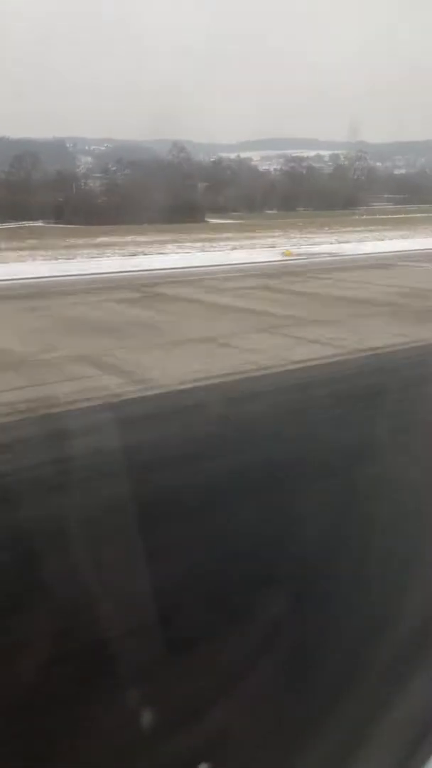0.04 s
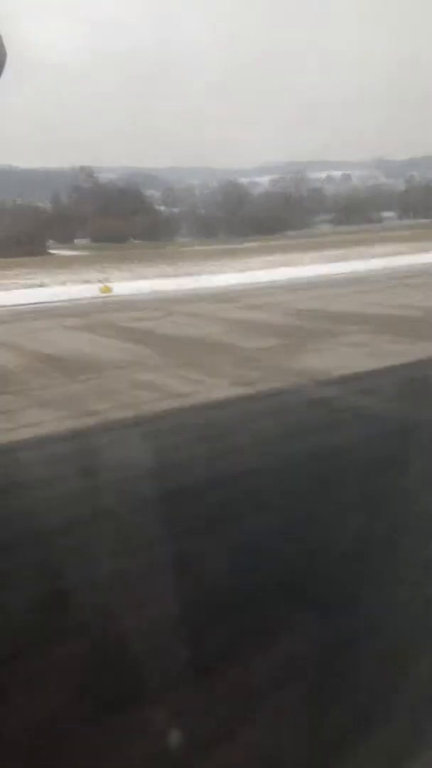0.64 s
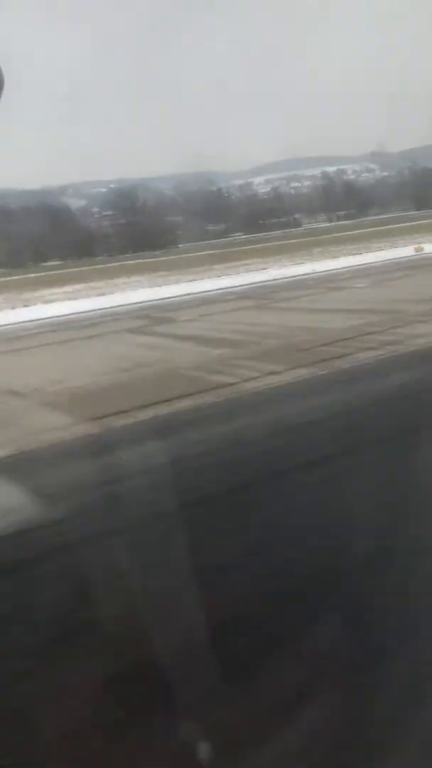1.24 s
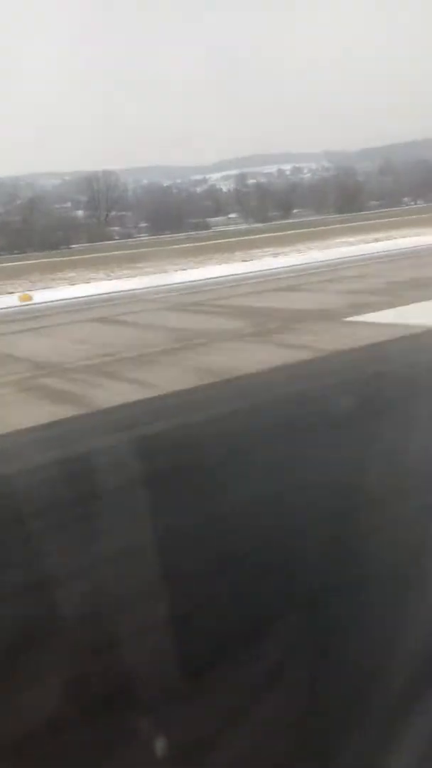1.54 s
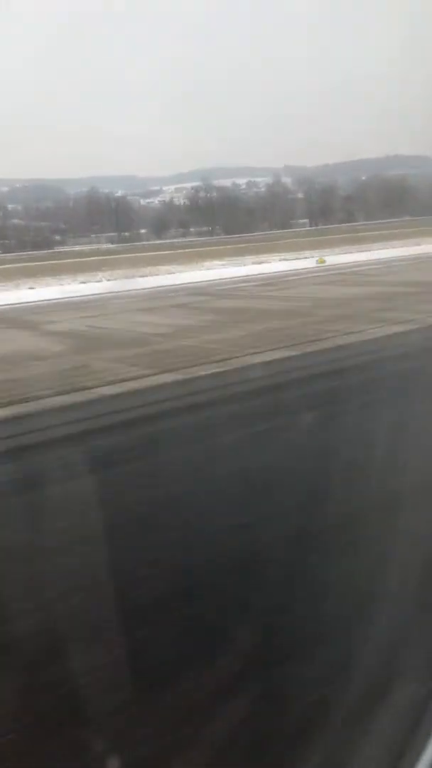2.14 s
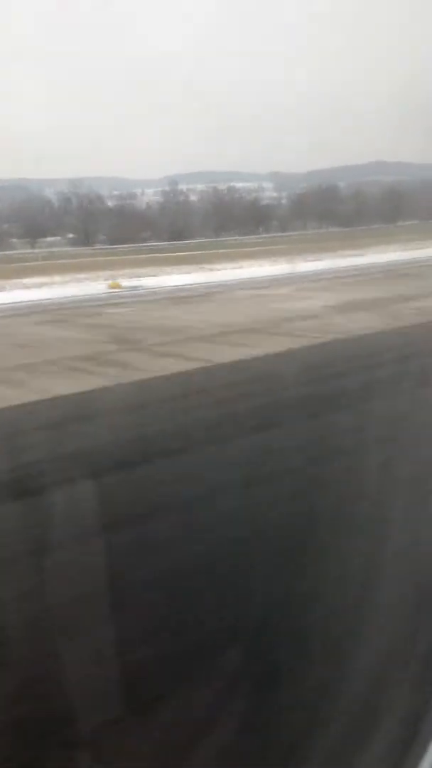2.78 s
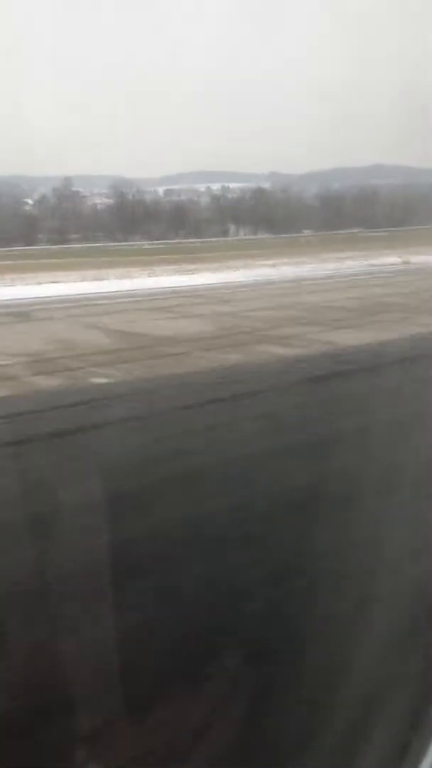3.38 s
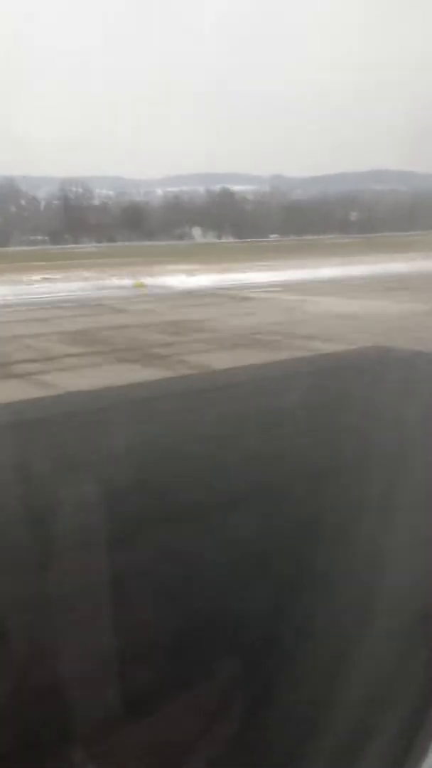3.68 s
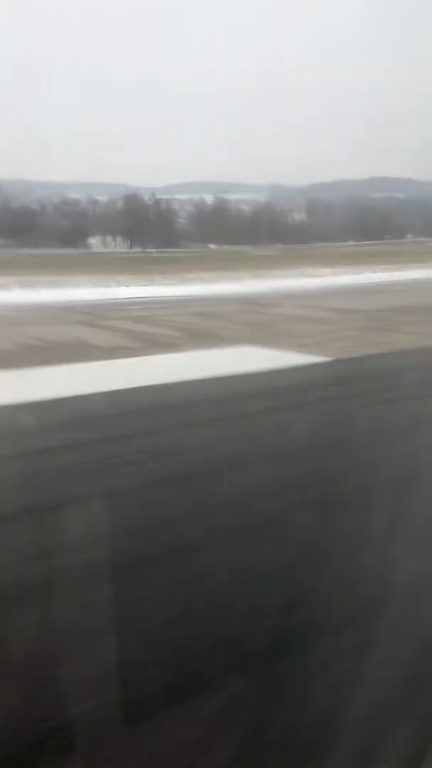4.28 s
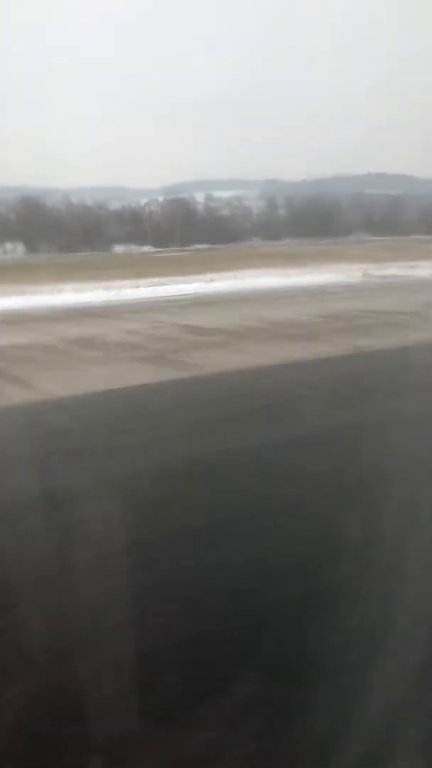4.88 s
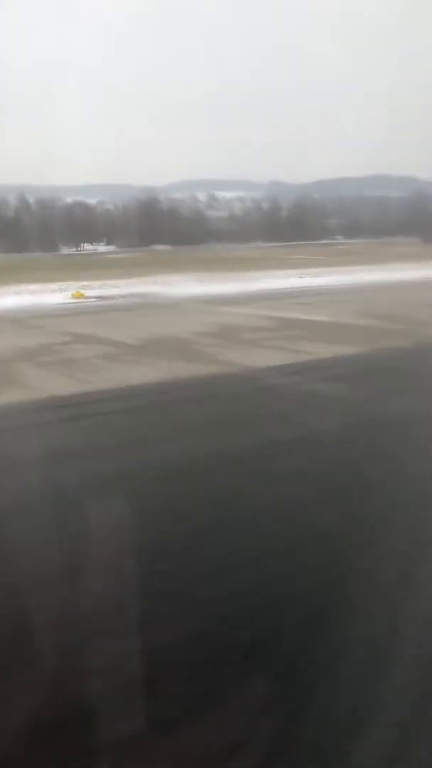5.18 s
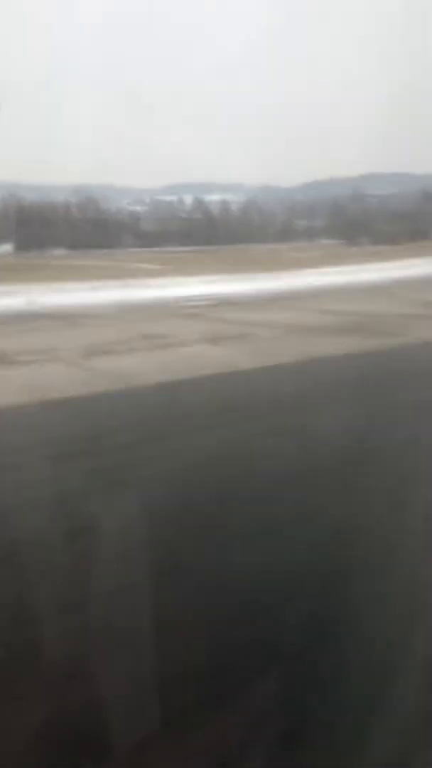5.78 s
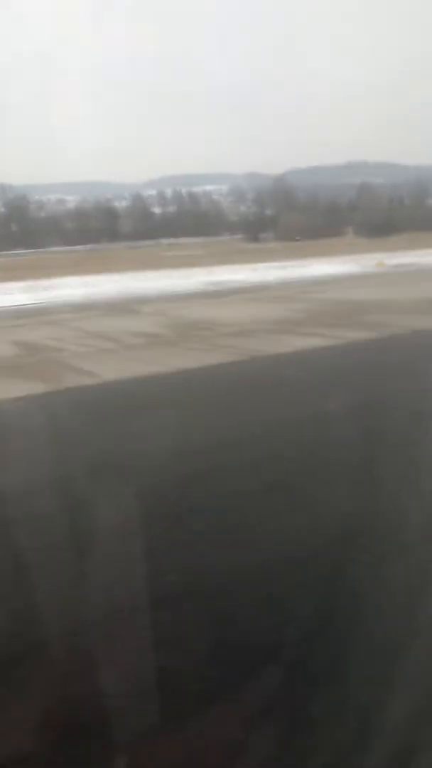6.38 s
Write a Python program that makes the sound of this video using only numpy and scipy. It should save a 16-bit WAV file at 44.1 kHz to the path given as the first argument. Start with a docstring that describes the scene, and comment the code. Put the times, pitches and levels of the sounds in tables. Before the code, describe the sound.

Inside an airliner rolling along a runway, a loud, steady tyre rumble and deep engine hum fill the cabin, with rushing air and a thin high whine. A loose part rattles in quick bursts near the window seat at the start. The engines growl, then ease to idle after about two seconds. The air noise builds slightly, and near the end the plastic trim scuffs and the rattle returns.

```python
"""An airliner rolls along the runway after landing, heard from a window seat.
From the start the engine shafts drone under a thin whine, tyres rumble, exhaust roars and air hisses,
while a small loose part chatters nearby. The engines growl, then ease to idle by about two seconds,
as a few faint swishes, scuffs of plastic trim and tiny squeaks come and go.
The air noise then slowly builds, and near the end the trim scuffs and the loose part chatters again."""
import sys
import numpy as np
from scipy import signal
from scipy.fft import rfft, irfft, next_fast_len
from scipy.io import wavfile
from scipy.ndimage import uniform_filter1d, map_coordinates

SR = 44100
rng = np.random.default_rng(int(sys.argv[2]) if len(sys.argv) > 2 else 0)


def bounce(signal):
    """Save signal as a 16-bit WAV file at the path given by the first command-line argument."""
    frames = np.transpose(np.atleast_2d(signal))
    limited = np.clip(frames, -1, 1)
    pcm = np.round(limited * 32767).astype(np.int16)
    wavfile.write(sys.argv[1], SR, pcm)


N = 292374
SHAFT_HZ = 85.45  # engine shaft turns per second

# how hard the engines push, given as the loudness of their growl: time_s, level_db
THRUST = [(0, -28.5), (.4, -25.5), (1.2, -26.5), (1.65, -30), (2.05, -43), (6.63, -55)]


def amp(db):
    """Turn decibels into a gain."""
    return 10 ** (np.asarray(db) / 20)


def unit(x):
    """Scale a signal to an average (rms) level of 1."""
    return x / np.sqrt(np.mean(x ** 2) + 1e-20)


def along(points, hz):
    """Read between (pitch_hz, value) points on a log pitch scale."""
    pitches, values = np.transpose(points)
    return np.interp(np.log(hz + 1), np.log(pitches + 1), values)


def curve(points):
    """Join (time_s, value) points with straight lines, one value per sample."""
    times, values = np.transpose(points)
    return np.interp(np.arange(N) / SR, times, values)


def swell(peak_s, half_length_s):
    """A bell-shaped rise to 1 and back."""
    return np.exp(-.5 * ((np.arange(N) / SR - peak_s) / half_length_s) ** 2)


def wobble(rate):
    """A smooth random curve through `rate` new values a second."""
    return map_coordinates(rng.standard_normal(int(N * rate / SR) + 4), [np.arange(N) * rate / SR])


def filtered(x, response):
    """Scale each frequency in x by response(hz)."""
    size = next_fast_len(N + SR // 2)
    return irfft(rfft(x, size) * response(np.fft.rfftfreq(size, 1 / SR)), size)[:N]


def rush(colour, patchy_db):
    """Rushing noise of a given tone colour, with drifting louder and softer patches."""
    slices = signal.stft(rng.standard_normal(N), nperseg=1024)[2]
    patches = uniform_filter1d(rng.standard_normal(slices.shape), size=8, axis=0)
    patches = uniform_filter1d(patches, size=12, axis=1)
    noise = signal.istft(slices * amp(patchy_db * unit(patches)), nperseg=1024)[1][:N]
    return unit(filtered(noise, lambda hz: amp(along(colour, hz))))


def narrow(centre_hz, width_hz):
    """Noise in one narrow band of pitch."""
    ring = lambda f: 1j * f * width_hz / (centre_hz ** 2 - f * f + 1j * f * width_hz)
    return unit(filtered(rng.standard_normal(N), lambda f: ring(f) ** 2))


def tone(turns, waver_db, rate):
    """A pure tone, one cycle per turn, that wavers in loudness."""
    return unit(np.sin(2 * np.pi * (turns + rng.random())) * amp(waver_db * wobble(rate)))


def spin(hz, drift_hz, rate):
    """A running count of turns at a speed that drifts a little."""
    return np.cumsum(hz + drift_hz * wobble(rate)) / SR


def level(idle_db, thrust_adds_db):
    """The gain of a layer that changes with how hard the engines push."""
    thrust_db = curve(THRUST)
    load = amp(thrust_db - thrust_db.max())  # 1 at full thrust, near 0 at idle
    return amp(idle_db + thrust_adds_db * load)


def drone(shaft):
    """A slightly unbalanced shaft shakes the cabin once a turn; its overtones come and go."""
    # rise and fall of the lowest note: time_s, level_db
    loudness = [(0.1, -11), (0.15, -11.5), (1.18, -16.5), (1.3, -21), (2.94, -13.5), (4.03, -16.5),
                (4.21, -13), (5.85, -11.5), (5.93, -17), (6.02, -10), (6.35, -15)]
    # higher notes: cycles_per_turn, level_db
    overtones = [(2, -29), (3, -30)]
    lowest = amp(curve(loudness) + 0.35) * tone(shaft, waver_db=.5, rate=11)
    return lowest + sum(amp(db) * tone(cycles * shaft, waver_db=3.5, rate=6) for cycles, db in overtones)


def whine(shaft):
    """Compressor blades sing around a whistle; the whistle leads under thrust, the blades at idle."""
    # blades and whistle together: time_s, level_db
    loudness = [(0.7, -65), (1.06, -57), (1.22, -66), (2.55, -57.5), (2.64, -65), (2.86, -61.5),
                (5.18, -61.5), (6.1, -65)]
    # blade tones: cycles_per_turn, relative_db
    blade_tones = [(64, -11.5), (65, -12.5), (66, -6.5), (67, -12.5), (68, -5.5), (69, -9)]
    # path of the whistle: time_s, pitch_hz
    whistle_pitch = [(0, 5630), (1.0, 5790), (2.6, 5800), (3.1, 5680), (3.6, 5730)]
    # a faint ring about an octave above the whistle: time_s, level_db
    octave_loudness = [(1.65, -88), (2.27, -74.5), (3.22, -77.5), (3.46, -71), (6.1, -74.5)]
    # steady turbine tones: pitch_hz, level_db
    turbine_tones = [(803, -50), (6530, -82), (6869, -83), (7293, -82), (7549, -82)]
    whistle_hz = curve(whistle_pitch)
    blades = 0
    for cycles, db in blade_tones:
        loss_db = 2.5 * ((cycles * SHAFT_HZ - whistle_hz) / 130) ** 2  # weaker away from the whistle
        blades += amp(db - loss_db) * tone(cycles * shaft, waver_db=1.5, rate=7.9)
    blades *= level(idle_db=3.5, thrust_adds_db=-8.5)
    # swirling air makes the whistle flutter in pitch and loudness
    whistle = tone(spin(whistle_hz, drift_hz=54.7, rate=300), waver_db=4, rate=70)
    whistle *= level(idle_db=-5, thrust_adds_db=5)
    octave = amp(1) * narrow(centre_hz=11500, width_hz=400)
    octave += amp(-6.5) * tone(spin(11535, drift_hz=5, rate=12), waver_db=5.5, rate=7)
    turbine = sum(amp(db) * tone(spin(hz, drift_hz=3, rate=11), waver_db=3, rate=5.4)
                  for hz, db in turbine_tones)
    octave *= amp(curve(octave_loudness) + 1.2 * wobble(6))
    return amp(curve(loudness)) * (blades + whistle) + octave + turbine


def growl():
    """The engine growls in a few bands of noise and dies down as the thrust is taken off."""
    # where the engine resonates: pitch_hz, width_hz, relative_db
    bands = [(139.4, 45, 2), (318, 70, 0), (380, 72, -6), (554, 170, -16), (1427, 150, -27.5),
             (2200, 320, -34.5), (3194, 220, -36), (4150, 1800, -36.5)]
    return amp(curve(THRUST)) * sum(amp(db) * narrow(hz, width) for hz, width, db in bands)


def rolling():
    """The wheels boom through the plane's body, the rough runway rumbles and the exhaust roars."""
    # tone colours of the three noises: pitch_hz, relative_db
    boom_colour = [(15, -38), (28, -36.5), (40, -18.5), (52, -15.5), (59, -0.5), (64, 1), (73, -6.5),
                   (90, -6), (130, -44), (300, -100)]
    rumble_colour = [(45, -60), (75, -7), (100, 0.5), (115, 1.5), (150, -0.5), (195, -5.5), (225, -3),
                     (270, -13), (400, -34), (1000, -89)]
    roar_colour = [(120, -42.5), (220, -6), (280, 2.5), (350, -5), (430, -3.5), (520, -11), (650, -13.5),
                   (730, -19), (830, -13.5), (950, -28.5), (1400, -46), (4000, -89)]
    boom = level(idle_db=-21, thrust_adds_db=-2.5) * rush(boom_colour, patchy_db=0)
    rumble = level(idle_db=-18, thrust_adds_db=-0.5) * rush(rumble_colour, patchy_db=-0.3)
    roar = level(idle_db=-26, thrust_adds_db=0.3) * rush(roar_colour, patchy_db=1.04)
    brief_dip = amp(-3 * swell(peak_s=2.12, half_length_s=0.19))
    return boom + brief_dip * (rumble + roar)


def air():
    """Air rushes along the outside, easing with the thrust and then building; the cabin vents hiss."""
    # tone colours of the outside air and the vents: pitch_hz, relative_db
    flow_colour = [(400, -36), (700, -2.5), (850, 3), (950, 0), (1130, -1), (1280, -6.5), (1520, -6.5),
                   (1800, -10.5), (2200, -15), (2800, -20.5), (5000, -43.5), (12000, -92)]
    hiss_colour = [(1200, -22.5), (2400, -1.5), (2800, -0.5), (3200, 6.5), (3700, 2), (4400, -2), (5300, 1),
                   (6300, -1), (7400, 0.5), (8400, -8), (10500, -10.5), (13000, -9.5), (17000, -13)]
    build_start_s, build_db_per_s = 2.5, 0.43
    build = amp(build_db_per_s * np.maximum(np.arange(N) / SR - build_start_s, 0))
    flow = level(idle_db=-43.5, thrust_adds_db=1.5) * rush(flow_colour, patchy_db=1)
    hiss = level(idle_db=-57.5, thrust_adds_db=-1) * rush(hiss_colour, patchy_db=1.5)
    return build * flow + hiss


def chatter(taps_per_s=88, taper_db=11):
    """A loose part taps its stop once per shake, hardest in the middle of each burst."""
    # bursts of tapping: start_s, peak_db, length_s
    bursts = [(0.019, -24.5, .057), (0.114, -25, .057), (.207, -31.5, .012), (0.242, -27.5, .046),
              (0.336, -25, .046), (0.516, -31.5, .012), (.535, -23.5, .046), (.629, -25.5, .012),
              (0.758, -28.5, .046), (0.917, -33, .023), (0.96, -32, .012), (6.175, -32, .012),
              (6.2, -27.5, .057), (6.267, -23, .057), (6.396, -22, .046), (6.489, -24.5, .046),
              (6.560, -23, .057)]
    # tone colour of one tap: pitch_hz, relative_db
    tap_colour = [(300, -50), (1500, -25), (2400, -9), (3200, -3), (6000, 0), (8500, -3), (11500, -2),
                  (13500, -9), (16000, -16), (20000, -24)]
    taps = np.zeros(N + SR)
    for start, db, length in bursts:
        count = max(1, round(length * taps_per_s))
        k = np.arange(count)
        from_middle = (2 * k + 1) / count - 1
        times = start + k / taps_per_s + rng.normal(0, .0004, count)
        tap_db = db - taper_db * from_middle ** 2 + rng.normal(0, 1, count)
        taps[np.round(abs(times) * SR).astype(int)] += amp(tap_db)
    # turn the tone colour into a dry click with its energy packed at the start
    size = 512
    gains = amp(along(tap_colour, np.fft.rfftfreq(size, 1 / SR)))
    cepstrum = irfft(np.log(gains))
    click = irfft(np.exp(rfft(2 * cepstrum[:size // 2], size)))
    return amp(3) * np.convolve(taps[:N], click / abs(click).max())[:N]


def swishes():
    """Something brushes softly close by, in uneven grainy patches."""
    # swishes and flicks: peak_s, level_db, half_length_s, pitch_hz, width_hz
    strokes = [(1.26, -66, .06, 9500, 2600), (2.37, -60, .1, 4700, 1900), (2.39, -66, .13, 10000, 4500),
               (2.33, -70, .09, 15500, 4000), (3.131, -54, .005, 4200, 2600)]
    return sum(amp(db + 3.1 * wobble(60)) * swell(peak, half_length) * narrow(hz, width)
               for peak, db, half_length, hz, width in strokes)


def scuffs(rise_s=0.00075):
    """Plastic trim shifts with short dry scuffs."""
    # each shift: start_s, level_db, fade_s (time to fall by 60 dB)
    shifts = [(1.552, -49, .04), (4.472, -54, .03), (6.128, -49, 0.054), (6.443, -35, .05)]
    # tone colour of a scuff: pitch_hz, relative_db
    colour = [(800, -15.5), (2200, 9.5), (4000, -3.5), (9000, -1), (14000, -6), (17000, -5.5)]
    t = np.arange(N) / SR
    loudness = sum(amp(db - 60 * np.maximum(t - start, 0) / fade) * np.clip((t - start) / rise_s, 0, 1)
                   for start, db, fade in shifts)
    return loudness * rush(colour, patchy_db=-1.5)


def squeaks():
    """The brushing surfaces stick and slip in faint rising squeaks."""
    # each squeak: peak_s, level_db, half_length_s, pitch_hz, rise_hz_per_s
    slips = [(2.17, -64, .02, 6080, 3000), (2.34, -66, .05, 6220, 2000), (2.28, -73, .05, 15200, 22000)]
    t = np.arange(N) / SR
    sound = np.zeros(N)
    for peak, db, half_length, hz, rise in slips:
        turns = spin(hz + rise * np.clip(t - peak, -.1, .1), drift_hz=60, rate=300)
        sound += amp(db) * swell(peak, half_length) * tone(turns, waver_db=3, rate=60)
    return sound


def scene():
    """All the sounds meet at the window seat, in one channel."""
    shaft = spin(SHAFT_HZ, drift_hz=.04, rate=10)
    engine = drone(shaft) + whine(shaft) + growl()
    return (engine + rolling() + air() + chatter() + swishes() + scuffs() + squeaks())[None]


def record(dry):
    """Round off the biggest peaks and cut the very highest treble."""
    top_hz = 17250
    rounded = dry / (1 + abs(dry) ** 10) ** (1 / 10)
    lowpass = signal.ellip(12, .05, 70, top_hz, fs=SR, output="sos")
    return signal.sosfiltfilt(lowpass, rounded)


dry = scene()
out = record(dry)
bounce(out)
```